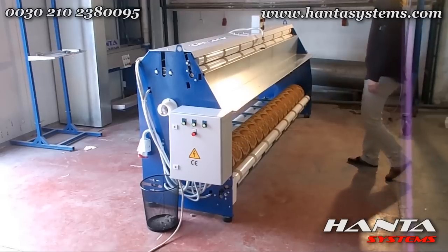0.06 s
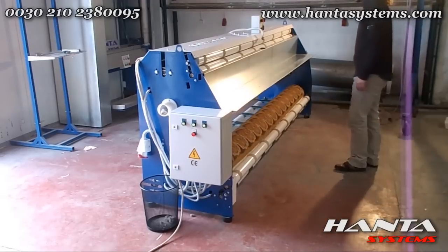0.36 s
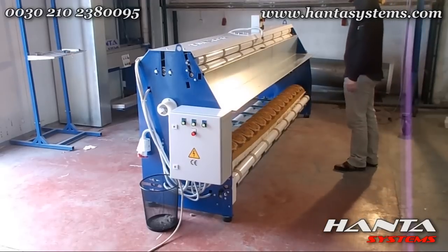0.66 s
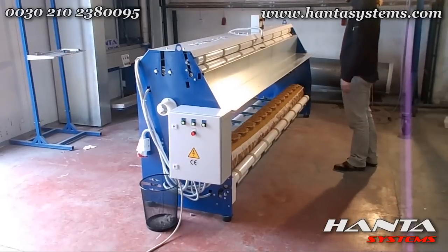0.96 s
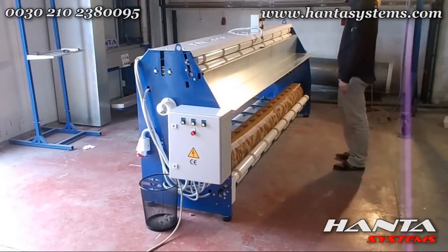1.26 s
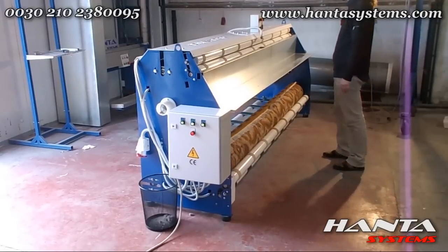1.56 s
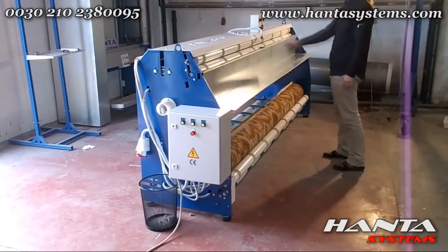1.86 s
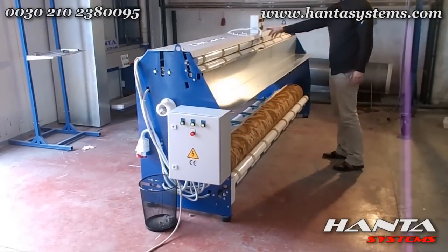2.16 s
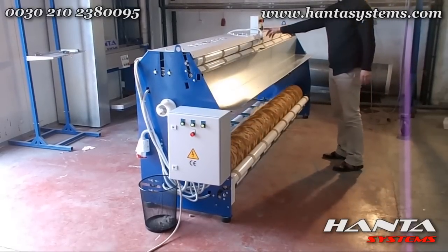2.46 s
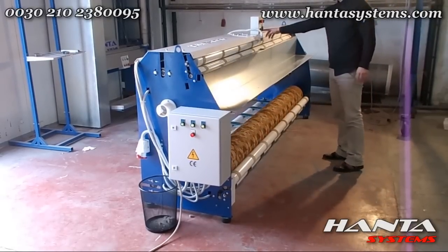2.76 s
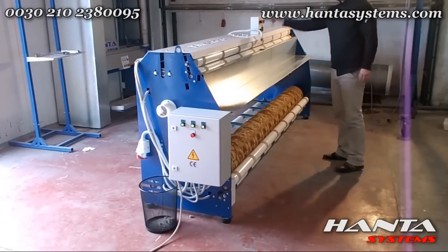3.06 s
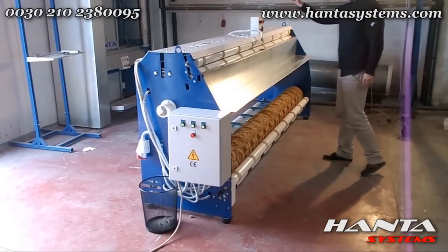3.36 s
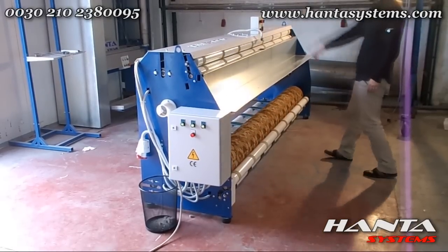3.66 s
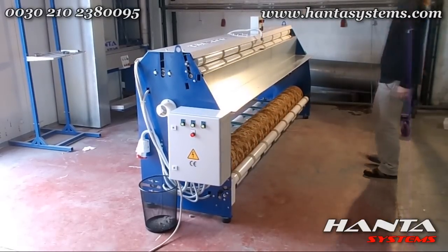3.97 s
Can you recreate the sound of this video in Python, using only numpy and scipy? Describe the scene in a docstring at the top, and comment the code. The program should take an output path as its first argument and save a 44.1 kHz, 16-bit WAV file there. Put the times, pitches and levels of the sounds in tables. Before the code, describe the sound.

A carpet dusting machine slaps about five times a second, with sheet metal rattling and gears whining. It winds down with a faint metallic ring, leaving a low hum and soft shoe scuffs, heard from a distance in an echoing workshop.

```python
"""Carpet duster running empty

In a hard-walled workshop, three rows of straps on a long shaft slap about five times a second and shake
the sheet-metal frame, over the rattle and whine of the drive. It is switched off, a last slow beat rings
away, and a low hum and a scuffing step remain. A small microphone stands back, hearing mostly the room."""
import sys
import numpy as np
from scipy import signal
from scipy.fft import rfft, irfft
from scipy.io import wavfile
from scipy.ndimage import uniform_filter1d

SR = 44100
rng = np.random.default_rng(int(sys.argv[2]) if len(sys.argv) > 2 else 0)


def wrap_up_sound(samples):
    """Save the sound to the file named by the first command line argument, as 16-bit audio."""
    columns = np.atleast_2d(samples).T
    # keep every value between -1 and 1, then stretch to whole-number steps
    tamed = np.clip(columns, -1, 1)
    steps = np.round(tamed * 32767).astype(np.int16)
    wavfile.write(sys.argv[1], SR, steps)


N = 176400
T = np.arange(N) / SR


def undb(db):
    """Decibels to gain."""
    return 10 ** (np.asarray(db) / 20)


def level(x, db):
    """Set the rms level."""
    return x * undb(db) / np.sqrt(np.mean(x ** 2) + 1e-20)


def lookup(hz, points):
    """Read a table on a log-frequency axis."""
    freqs, values = np.array(points, float).T
    return np.interp(np.log(hz + 1e-9), np.log(freqs), values)


def colour(x, points):
    """Causal filter with the response (frequency [Hz], gain [dB])."""
    n = 2 * len(x)
    gain = undb(lookup(np.arange(n // 2 + 1) * SR / n, points))
    cepstrum = irfft(np.log(gain))
    cepstrum[1:n // 2] *= 2  # fold to minimum phase
    cepstrum[n // 2 + 1:] = 0
    return irfft(rfft(x, n) * np.exp(rfft(cepstrum)))[:len(x)]


def at_mic(x, spectrum, db):
    """Colour a source, drop any lead-in and set its level at the microphone."""
    return level(colour(x, spectrum)[-N:], db)


def wander(rate_hz, size):
    """Slow random drift with a spread of 1."""
    hold = int(SR / rate_hz)
    stairs = np.repeat(rng.standard_normal(size // hold + 1), hold)
    drift = uniform_filter1d(stairs, hold)[:size]
    return drift / drift.std()


def tone(hz, db, waver_hz=1.27):
    """A sine that wavers slightly in pitch."""
    pitch = hz + waver_hz * wander(17, N)
    return np.sqrt(2) * undb(db) * np.sin(2 * np.pi * np.cumsum(pitch) / SR)


def clicks(per_s, spread_db, size):
    """Dense contacts of uneven strength, with even power over a few hundredths of a second."""
    hits = (rng.random(size) < per_s / SR) * rng.choice([-1, 1], size)
    hits = hits * undb(spread_db * rng.standard_normal(size))
    power = np.abs(uniform_filter1d(hits ** 2, size=1200))
    return hits / np.sqrt(power + 1e-6)


def burst(t, start_s, length_s):
    """Swell and fade of a cluster of contacts; its energy does not depend on its length."""
    age = np.maximum(t - start_s, 0) / length_s * 2
    return age * np.exp(-age) / np.sqrt(length_s)


def workshop(x, direct_db=-4.5, early_db=-8, early_s=0.032):
    """Hard walls heard from a distance: direct sound, sparse early reflections, a long tail that dulls."""
    # reverberation of the room (frequency [Hz], time to fall 60 dB [s])
    decay_times = [(150, 1.2), (500, 1.28), (1200, 1.18), (3000, 1.26), (5000, 1), (8000, 1.03),
                   (12000, 0.58)]
    t = T[:N // 2]
    noise = rfft(rng.standard_normal(len(t)))
    hz = np.arange(len(noise)) * SR / len(t)
    centres = 125 * 2. ** np.arange(0, 7.5, .5)  # half-octave bands
    tail = 0
    for centre, pick in zip(centres, np.eye(len(centres))):
        band = irfft(noise * np.interp(hz, centres, pick))
        tail = tail + band * np.exp(-np.log(1000) * t / lookup(centre, decay_times))
    early = (rng.random(len(t)) < 400 / SR) * rng.standard_normal(len(t)) * np.exp(-t / early_s)
    response = tail * np.sqrt(2 * np.log(1000) / SR) + undb(early_db) * early / np.linalg.norm(early)
    response[0] += undb(direct_db)
    return signal.fftconvolve(x, response)[:len(x)]


def scattered(force, per_s, spread_db, spots=4):
    """Contacts spread along the machine: each spot reaches the microphone by its own paths."""
    return sum(workshop(force * clicks(per_s / spots, spread_db, len(force))) for _ in range(spots))


def room_tone():
    """The air of the workshop, a faint idle hum and a thin electrical whistle."""
    # partials of the hum and the whistle (frequency [Hz], level [dB])
    hum = [(538, -78), (700, -77), (937, -80), (1507, -75)]
    whistle = [(10740, -94), (10826, -85), (10907, -87), (11143, -89), (11230, -87), (11310, -96)]
    # colour of the room air (frequency [Hz], gain [dB])
    air = [(30, -40), (100, -27), (220, -8.5), (350, -6.5), (550, -1.5), (1000, 4.5), (1800, -2.5),
           (3000, -8), (4200, -10), (6000, -15), (10200, -18), (11100, -20.5), (11650, -26), (13000, -28)]
    return sum(tone(hz, db) for hz, db in hum + whistle) + at_mic(rng.standard_normal(N), air, db=-62)


def steps(t):
    """Shoes scuff the concrete as the operator walks off."""
    # scuffs (time [s], relative level [dB], length [s])
    scuffs = [(3.605, -2, 0.017), (3.89, 1, 0.037), (3.944, 0.5, 0.024)]
    # colour of a sole on concrete (frequency [Hz], gain [dB])
    sole = [(200, -20), (1000, -1), (3000, 0.5), (5000, -6), (9000, -19), (13000, -30)]
    force = sum(undb(db) * burst(t, start, length) for start, db, length in scuffs)
    grit = clicks(per_s=4000, spread_db=3, size=len(t))
    return at_mic(workshop(force * grit), sole, db=-77.5)


def tick(t):
    """One light, bright tick of the switch contactor."""
    # colour of the tick (frequency [Hz], gain [dB])
    spectrum = [(500, -25), (3000, -2), (7000, -3), (10000, -2), (13000, -12)]
    contact = burst(t, start_s=2.999, length_s=.004) * rng.standard_normal(len(t))
    return at_mic(workshop(contact), spectrum, db=-86)


def rundown(peak_s=3.15, width_s=0.22):
    """A faint metallic singing that swells and fades as the shaft stops."""
    # singing tones (frequency [Hz], level at the crest [dB])
    partials = [(1179, -70), (1550, -59.5), (2223, -58), (2417, -59)]
    swell = np.exp(-((T - peak_s) / width_s) ** 2)
    return sum(tone(hz, db) for hz, db in partials) * swell


def drive(t, off_s=2.72, coast_s=0.66, stop_s=3.19, brake_s=0.057):
    """Chain and rollers rattle and the gears whine until the motor coasts to a stop."""
    # colour of chain and rollers (frequency [Hz], gain [dB])
    chain = [(30, -41), (65, -37), (110, -42), (155, -14.5), (190, -21.5), (225, -5), (270, -9.5),
             (470, -3), (510, 1), (580, 3.5), (720, -2), (1300, 1.5), (2400, -1.5), (3100, -1),
             (4500, -3.5), (6500, -20), (12000, -44.5)]
    # motor and gear tones at full speed (frequency [Hz], level [dB])
    gear_tones = [(222, -67.5), (239, -68.5), (299, -65), (562, -57), (912, -61.5), (1075, -55),
                  (1202, -63), (1251, -60), (1431, -61), (1610, -67), (1869, -73), (2025, -48)]
    pitch_wobble, flutter_db, slowing_per_s = 0.0019, 2, .35
    since_off = np.maximum(t - off_s, 0)
    effort = np.exp(-since_off / coast_s - np.maximum(t - stop_s, 0) / brake_s)
    speed = np.exp(-since_off * slowing_per_s)
    rattle = at_mic(scattered(effort, per_s=900, spread_db=3.5, spots=2), chain, db=-41)
    whine = 0
    for hz, db in gear_tones:
        pitch = hz * speed * (1 + pitch_wobble * wander(25.04, len(t)))
        gain = undb(db + flutter_db * wander(9.9, len(t)))
        whine = whine + gain * np.sin(2 * np.pi * np.cumsum(pitch) / SR)
    return rattle + (whine * effort ** 2)[-N:]


def beater(t, frame_lag_s=0.0077, frame_stretch=1.52):
    """Each row of straps lands as a spray of slaps; the frame rattles just after, and for longer."""
    # rows landing (time [s], relative slap level [dB], relative frame level [dB], landing time [s])
    beats = [(-.018, 3.5, -6, 0.041), (0.171, 1, -2.5, 0.037), (0.344, 3.5, 2, 0.037),
             (.545, 2.5, -2.5, 0.042), (0.735, 1, -1, 0.033), (.902, 3, -0.5, 0.034),
             (1.108, 2, -0.5, 0.039), (1.294, 2.5, -1.5, 0.043), (1.456, 3.5, 0.5, 0.044),
             (1.671, 1.5, -2.5, 0.033), (1.855, 2, 3.5, 0.034), (2.024, 2.5, 0, 0.038),
             (2.232, 1, -2.5, 0.038), (2.418, 1, 0, 0.029), (2.585, 3.5, 1, 0.046), (2.795, 2, -0.5, 0.032),
             (3.042, -2.5, -4, 0.03)]
    # colours of the straps and the sheet-metal frame (frequency [Hz], gain [dB])
    straps = [(40, -62), (120, -48), (500, -12.5), (1500, -4), (2500, -2.5), (3100, 1.5), (3800, -1.5),
              (4700, -1.5), (6300, -12), (8500, -13), (10200, -19.5), (11000, -27.5), (11800, -27),
              (13300, -41.5)]
    sheet_metal = [(40, -48), (100, -30), (200, -21), (500, -9.5), (1000, -1.5), (1500, 1), (2300, 4.5),
                   (3300, -8), (4800, -6.5), (6500, -21.5), (12000, -52.5)]
    turn_s = beats[3][0] - beats[0][0]  # three rows to a turn of the shaft
    lead_in = [(start - turn_s, *rest) for start, *rest in beats[:3]]
    slap_force = frame_force = 0
    for start, slap_db, frame_db, length in lead_in + list(beats):
        slap_force += undb(slap_db) * burst(t, start, length)
        frame_force += undb(frame_db) * burst(t, start + frame_lag_s, length * frame_stretch)
    slaps = at_mic(scattered(slap_force, per_s=2200, spread_db=3.5), straps, db=-40.5)
    rattle = at_mic(scattered(frame_force, per_s=700, spread_db=5.2), sheet_metal, db=-40.5)
    return slaps + rattle


def scene():
    """The machine is already running in a one-second lead-in, so the room is full of sound."""
    t = np.arange(-SR, N) / SR
    return (beater(t) + drive(t) + rundown() + steps(t) + tick(t) + room_tone())[None]


def record(dry):
    """A small mono microphone that rings near 3 kHz and cuts the top."""
    # resonance of the microphone port (frequency [Hz], gain [dB])
    port = [(2000, -1.5), (2600, 3.5), (2850, 10), (3120, 12), (3370, 9.5), (3520, 2), (4000, -3)]
    top_cut = signal.ellip(10, .2, 80, 13300, fs=SR, output="sos")
    return signal.sosfilt(top_cut, colour(dry[0], port))[None]


dry = scene()
out = record(dry)
wrap_up_sound(out)
```